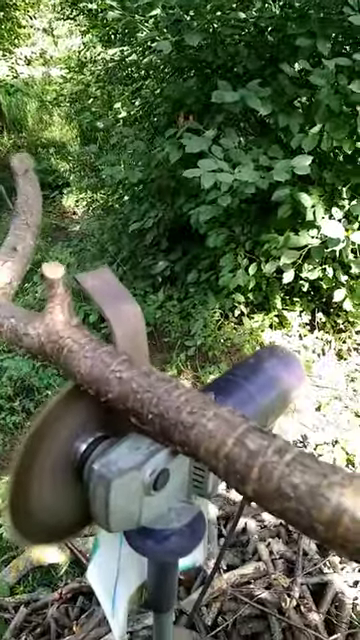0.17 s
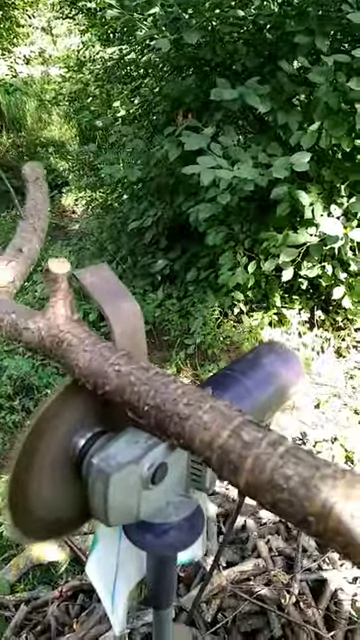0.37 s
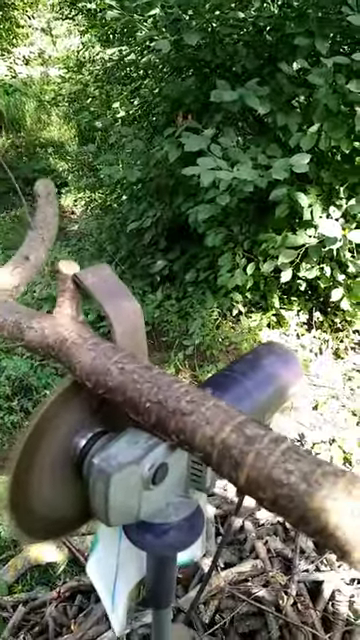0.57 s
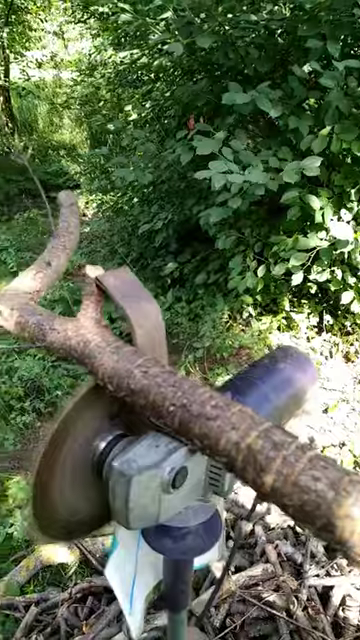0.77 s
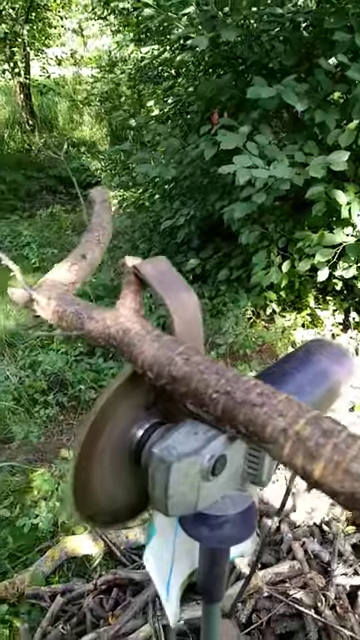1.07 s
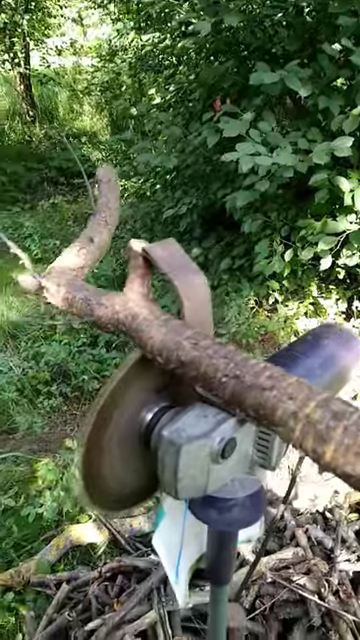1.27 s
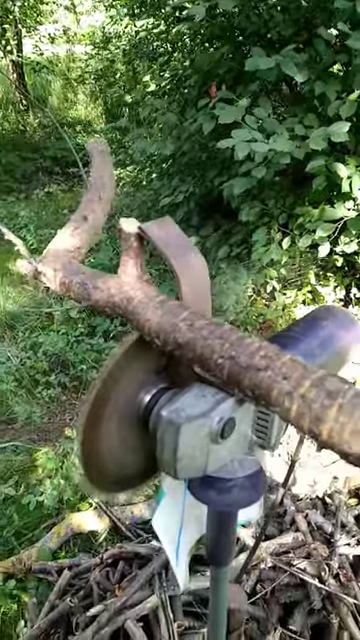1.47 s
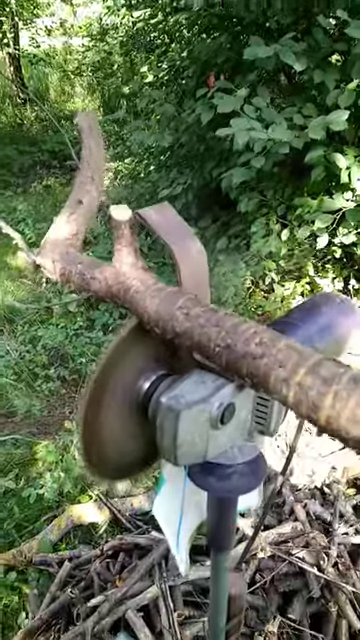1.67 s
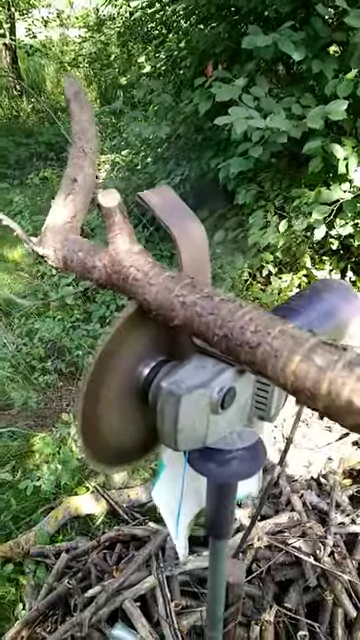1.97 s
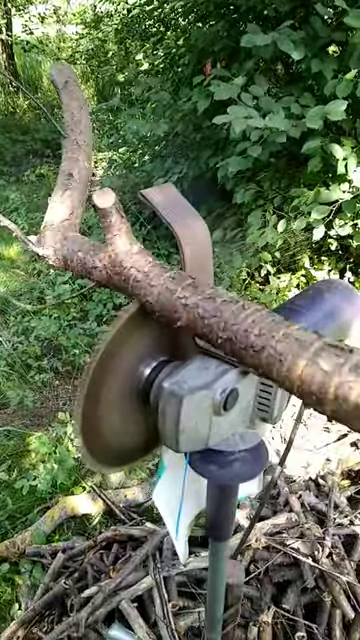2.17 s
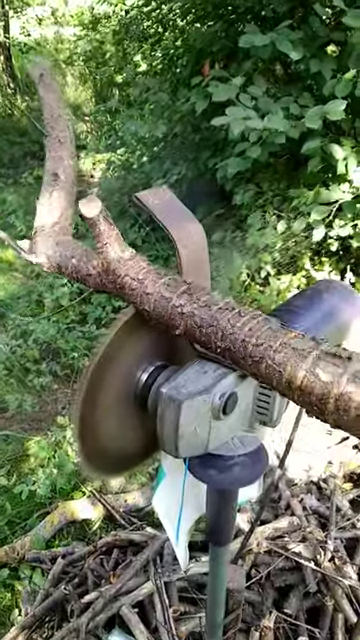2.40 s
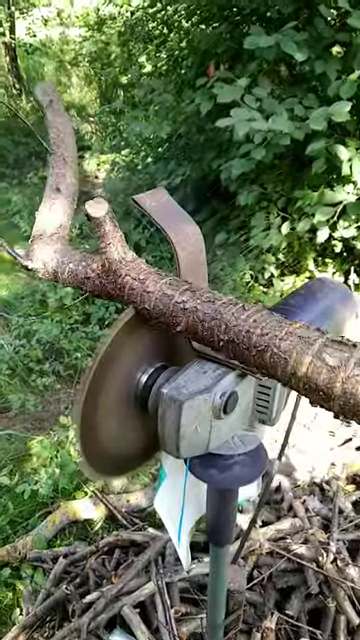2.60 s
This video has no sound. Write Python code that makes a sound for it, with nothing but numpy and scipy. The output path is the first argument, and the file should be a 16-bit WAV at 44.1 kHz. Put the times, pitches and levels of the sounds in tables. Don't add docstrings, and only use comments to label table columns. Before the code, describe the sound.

Loud metallic whine of an angle grinder slowing against wood, with harsh scraping, squeals and rushing hiss.

```python
import sys
import numpy as np
from scipy import signal
from scipy.fft import irfft, next_fast_len
from scipy.io import wavfile
from scipy.ndimage import uniform_filter1d

SR = 44100
rng = np.random.default_rng(int(sys.argv[2]) if len(sys.argv) > 2 else 0)


def transcribe(signal):
    frames = np.atleast_2d(signal).T
    limited = np.clip(frames, -1, 1)
    pcm = np.round(limited * 32767).astype(np.int16)
    wavfile.write(sys.argv[1], SR, pcm)


def level_to_linear(level):
    exponent = np.asarray(level, float) / 20
    return 10 ** exponent


N = 120834
T = np.arange(N) / SR


def evened(x):
    return x / np.sqrt(np.mean(abs(x) ** 2) + 1e-20)


def along(points):
    return np.interp(T, *np.transpose(points))


def read(points, hz):
    f, value = np.transpose(points)
    return np.interp(np.log(hz + 1), np.log(f + 1), value)


def drift(rate_hz, channels=1):
    f = np.geomspace(rate_hz / 20, rate_hz, 12)[:, None]
    t = T[::256]
    curves = []
    for _ in range(channels):
        sines = np.sin(2 * np.pi * (f * t + rng.random(f.shape)))
        curves.append(np.interp(T, t, evened(sines.sum(0))))
    return np.array(curves)


def gate(start, length, rise, fall):
    opening = np.clip((T - start) / rise + .5, 0, 1)
    return opening * np.exp(-np.maximum(T - start - length, 0) / fall)


def pair(same, shape):
    a, b, c, d = rng.standard_normal((4,) + shape)
    same = np.clip(same, -1, 1)
    left = a + 1j * b
    right = same * left + np.sqrt(1 - same ** 2) * (c + 1j * d)
    return np.array([left, right])


def lean(db):
    return level_to_linear(np.array([[.5], [-.5]]) * db)


# t/s, lead/us
LEFT_LEAD = [(0, 15), (.8, 10), (1.2, -5), (1.9, -45), (2.74, -28)]


def carried(hz, shape, span=slice(None)):
    lead = np.exp(1j * np.pi * along(LEFT_LEAD)[span] * hz / 1e6)
    tone = np.exp(2j * np.pi * np.cumsum(hz) / SR)
    return np.sqrt(2) * (shape * tone * np.array([lead, lead.conj()])).real


def ring(hz, width_hz):
    hop, same, steady = 64, .75, 1.7
    r = np.exp(-np.pi * width_hz / SR * hop)
    shaken = signal.lfilter([1], [1, -r], pair(same, (N // hop + 60,)))
    slow = evened(shaken[:, 50:])
    phase = np.cumsum(rng.standard_normal(slow.shape[1])) * np.sqrt(2 - 2 * r)
    slow = evened(slow + steady * np.exp(1j * phase))
    at = np.arange(slow.shape[1]) * hop
    return carried(hz, np.array([np.interp(np.arange(N), at, s) for s in slow]))


def noise(shape_db, same, patch_db, comb_db=0):
    frames, hz = N // 256 + 5, np.fft.rfftfreq(1024, 1 / SR)
    patches, comb = rng.standard_normal((2, frames, 513))
    patches = evened(uniform_filter1d(uniform_filter1d(patches, 14, 0), 10, 1))
    comb = evened(uniform_filter1d(uniform_filter1d(comb, 18, 0), 3, 1))
    comb = comb * np.clip(hz / 2800, 0, 1) ** 2
    gain = level_to_linear(shape_db(hz) + patch_db * patches + comb_db * comb)
    z = pair(read(same, hz), (frames, 513)) * gain
    return evened(signal.istft(z.transpose(0, 2, 1), nperseg=1024, noverlap=768)[1][:, :N])


# t/s, f/Hz
MESH = [
    (0, 4560),
    (.3, 4400),
    (.85, 4010),
    (1.5, 3700),
    (2.0, 3535),
    (2.74, 3500),
]


def slowing():
    return (MESH[0][1] - along(MESH)) / (MESH[0][1] - MESH[-1][1])


# fast f/Hz, slow f/Hz, width/Hz
WITH = [(3310, 3170, 35), (4430, 4338, 25), (5905, 5760, 25), (7720, 7510, 25), (7640, 7415, 18),
        (9170, 8860, 35), (9450, 9250, 30), (10560, 10300, 40), (10870, 10760, 35), (11400, 11220, 30),
        (12120, 11700, 30), (13570, 13280, 30), (2760, 2720, 45)]
# fast level/dB, slow level/dB
WITH_RING = [(-42.5, -47), (-41.5, -30), (-35, -37), (-37, -36.5), (-67, -28.5), (-37.5, -38), (-42.5, -32),
             (-44, -37.5), (-64, -32.5), (-60, -38), (-53, -46), (-54, -54), (-44.5, -45)]
# fast f/Hz, slow f/Hz, width/Hz
AGAINST = [(3550, 3630, 22), (4700, 4835, 25), (6150, 6250, 25), (7680, 7850, 22), (8200, 8150, 45),
           (6480, 6400, 25), (3230, 3290, 40)]
# fast level/dB, slow level/dB
AGAINST_RING = [(-48.5, -43), (-54, -39.5), (-78.5, -33), (-46, -35.5), (-37, -61), (-30.5, -63),
                (-39.5, -44)]
# start t/s, length t/s, level/dB, f/Hz
SURGES = [(1.235, 0.074, -28.5, 4350), (1.646, 0.054, -34, 4345), (2.195, .044, -38, 4335),
          (2.582, 0.047, -35, 4330), (2.674, .05, -39, 4330), (.864, 0.025, -35, 7670),
          (0.97, 0.21, -38, 7700), (1.227, 0.041, -35, 7640), (1.421, 0.026, -34, 6800),
          (0.96, 0.027, -31, 7470), (1.616, 0.03, -36, 7450), (2.5, 0.051, -33, 7510),
          (.852, 0.15, -43, 9800), (1.427, 0.32, -33.5, 9290), (2.4, 0.24, -33, 9270),
          (2.321, 0.075, -42, 9250), (2.454, .19, -40, 9250), (.978, 0.02, -34, 5810),
          (0.75, .05, -36, 5830), (0.62, 0.093, -27.5, 9410), (.62, 0.12, -28.5, 7700),
          (.15, 0.17, -39, 9150), (0.018, .2, -37, 13560), (0.29, 0.066, -34, 12070),
          (1.33, .12, -37.5, 10400), (2.45, .29, -34, 13285), (1.65, .6, -38, 13300),
          (2.5, .24, -32, 10290), (1.8, .35, -34, 8870), (2.38, 0.18, -28, 6250), (2.26, 0.36, -32.5, 5762),
          (0.203, 0.413, -33, 4410), (1.45, 0.71, -40.5, 5780)]
# t/s, left-right level/dB
RING_LEAN = [(0, -14), (.9, -1.5), (2.74, -0.5)]
GEAR = [1, 1.04, 1.13, 2.02, 2.09]
GEAR_DB = [-47, -44.5, -41, -43, -35.5]


def disc():
    swell_db, swell_hz = 1.2, [12, 11]
    edge_s, burst_rings_db = .015, -4
    gear_width_hz, gear_fade_db = 8, -4
    mesh, slowed = along(MESH), slowing()
    waves, strengths = WITH + AGAINST, WITH_RING + AGAINST_RING
    pitches = np.array([f + (g - f) * slowed for f, g, _ in waves])
    surges = np.zeros_like(pitches)
    for s, d, db, hz in SURGES:
        nearest = np.argmin(abs(pitches[:, round(s * SR)] - hz))
        surges[nearest] += level_to_linear(db) * gate(s, d, edge_s, edge_s)
    shakes = []
    for (s, d, low, high), db in zip(BURSTS, BURSTS_DB):
        shakes.append((low, high, level_to_linear(db + burst_rings_db) * gate(s, d, 3 * edge_s, 3 * edge_s)))

    out = np.zeros((2, N))
    for (f, g, w), (a, b), pitch, surge in zip(waves, strengths, pitches, surges):
        shaken = sum(shake for low, high, shake in shakes if low < (f + g) / 2 < high)
        drive = level_to_linear(a + (b - a) * slowed) + shaken * level_to_linear(.5 * (a + b) + 36) + surge
        out += drive * level_to_linear(swell_db * drift(swell_hz[0])) * ring(pitch, w)
    for multiple, db in zip(GEAR, GEAR_DB):
        level_db = db + gear_fade_db * slowed + swell_db * drift(swell_hz[1])
        out += level_to_linear(level_db) * ring(multiple * mesh, gear_width_hz)
    return out * lean(along(RING_LEAN))


def band_bursts(rows, levels_db, lean_db):
    same, edge_s = 0.09, .018
    out, size = np.zeros((2, N)), next_fast_len(N)
    hz = np.fft.rfftfreq(size, 1 / SR)
    z = pair(same, hz.shape)
    for (s, d, low_hz, high_hz), db in zip(rows, levels_db):
        inside = np.clip(np.minimum(hz - low_hz, high_hz - hz) / 60, 0, 1)
        band = np.roll(z, round(s * SR), 1) * inside
        out += level_to_linear(db) * gate(s, d, edge_s, edge_s) * evened(irfft(band, size)[:, :N])
    return out * lean(lean_db) * level_to_linear(drift(30))


# start t/s, length t/s, low f/Hz, high f/Hz
BURSTS = [(0, .76, 5000, 6100), (0, .34, 6100, 9500), (.38, .07, 7500, 9500), (.6, .16, 7600, 9500),
          (.6, .16, 5000, 6150), (.22, .1, 5000, 6400), (1.26, .1, 5000, 6100), (1.64, .1, 5000, 6000),
          (2.38, .23, 5900, 7700), (2.03, .22, 2700, 3500), (1.58, .15, 1300, 3000), (2.0, .07, 5000, 6000),
          (.2, .6, 2600, 4500), (2.26, .12, 6800, 7900)]
BURSTS_DB = [-22.5, -32.5, -28.5, -26.5, -33, -22, -31, -31.5, -25, -36.5, -33, -35, -35, -27.5]


def bursts():
    return band_bursts(BURSTS, BURSTS_DB, lean_db=-1.5)


# start t/s, length t/s, low f/Hz, high f/Hz
FIZZ = [
    (0, .05, 12000, 15400),
    (.17, .08, 12000, 15400),
    (.295, .06, 12000, 15400),
    (.47, .07, 9600, 15400),
]
FIZZ_DB = [-43, -29, -22.5, -29.5]


def fizz():
    return band_bursts(FIZZ, FIZZ_DB, lean_db=-11.5)


# f/Hz, level/dB per Hz
HISS = [(180, -59), (300, -16.5), (2480, -6.5), (2740, -8), (3810, -6.5), (4280, -6.5), (5050, -9.5),
        (7250, -8), (15500, -13.5)]
# t/s, level/dB
HISS_DB = [(0.0, -30.5), (2.51, -31.5), (2.74, -32.5)]
# f/Hz, likeness/-1 to 1
HISS_SAME = [(300, -0.2), (1200, 0.24), (3000, -0.45), (5500, -0.13), (15000, 0.17)]
# fast f/Hz, slow f/Hz, width/Hz
DIPS = [(4900, 5010, 70), (6750, 6750, 250), (8600, 8370, 200), (10000, 9950, 200), (3750, 3830, 110),
        (4650, 4550, 80), (11000, 10960, 110), (12600, 12250, 200), (9700, 9540, 90), (5400, 5500, 120),
        (6050, 5980, 70), (8050, 8020, 70)]
DIPS_DB = [-9, -3.5, 0, -2, -5, -10, 2, -2, -3, 1, -5, -2]


def hiss():
    lift_db, swell_db = 10, 0.4
    t = np.arange(N // 256 + 5)[:, None] * 256 / SR
    slowed = np.interp(t, T, slowing())

    def shape(hz):
        dips = 0
        for (f, g, w), db in zip(DIPS, DIPS_DB):
            dips = dips + db * np.exp(-((hz - f - (g - f) * slowed) / w) ** 2)
        return read(HISS, hz) + dips - 30 * (hz < 150)

    level_db = along(HISS_DB) + lift_db + swell_db * drift(16)
    return noise(shape, HISS_SAME, patch_db=1.2, comb_db=5.5) * level_to_linear(level_db)


# f/Hz, level/dB per Hz
WIND = [(15, -43), (25, -37), (97, -4), (162, -7.5), (275, -5), (515, -16.5), (700, -16), (910, -42),
        (1540, -120)]
# f/Hz, level/dB per Hz
LOW_LEFT = [(25, -49), (60, -4.5), (120, -4.5), (250, -4.5), (700, -5.5), (1200, -21)]
# t/s, level/dB
GUSTS = [
    (0, -47.5),
    (.4, -52),
    (.5, -40),
    (.62, -39),
    (.7, -45.5),
    (1.3, -49),
    (2.74, -48),
]
# t/s, level/dB, f/Hz
THUMPS = [(0.371, -27, 102), (0.476, -23.5, 109), (.517, -22, 140), (0.586, -21, 96), (0.689, -32, 70),
          (0.868, -28, 89), (1.188, -25, 84.5), (1.219, -31, 61.5), (1.589, -28, 91), (1.92, -33, 65),
          (1.55, -32, 60)]


def wind():
    right_db, left_db, lump_db, thump_cycles = 8, -40, 1.5, 0.7
    lumps = level_to_linear(lump_db * drift(30, channels=2))
    apart = [(1, 0), (SR, 0)]
    left = noise(lambda hz: read(LOW_LEFT, hz) - 40 * (hz > 1200), apart, 1)[0] * level_to_linear(left_db)
    right = noise(lambda hz: read(WIND, hz) - 40 * (hz > 700), apart, 1)[0] * level_to_linear(along(GUSTS) + right_db)
    thumps = np.zeros(N)
    for s, db, hz in THUMPS:
        puff = np.exp(-((T - s) * hz / thump_cycles) ** 2)
        thumps += level_to_linear(db) * puff * np.sin(2 * np.pi * hz * (T - s))
    return lumps * np.array([left, right]) + np.array([0 * T, thumps])


# start t/s, length t/s, f/Hz, level/dB, left-right level/dB
FLARES = [(0.021, 0.028, 5910, -30, -16), (0.109, 0.039, 5892, -32, -20), (0.239, 0.023, 5890, -27, -29),
          (0.372, 0.043, 5895, -18, -7), (0.49, 0.074, 5880, -24.5, 6), (0.601, 0.035, 5860, -11, -6),
          (.65, 0.021, 5865, -14, -9), (.688, 0.018, 5840, -9.5, -4.5), (0.724, 0.012, 5855, -16.5, 13),
          (0.765, 0.089, 5840, -32, 6), (1.283, .05, 5785, -24.5, -5), (0.285, 0.085, 4415, -30, 4),
          (0.529, 0.07, 4400, -27, -4)]


def flares():
    rise_s, fall_s = .006, .006
    out, wobble = np.zeros((2, N)), level_to_linear(1.2 * drift(70))
    for s, d, hz, db, side_db in FLARES:
        span = slice(max(round((s - .02) * SR), 0), round((s + d + .08) * SR))
        shape = (level_to_linear(db) * wobble * gate(s, d, rise_s, fall_s))[:, span]
        out[:, span] += lean(side_db) * carried(hz + 0 * T[span], shape, span)
    return out


# start t/s, length t/s, f/Hz, width/Hz
SHADES = [(.33, .08, 6900, 350), (.49, .12, 6750, 450), (.68, .1, 6650, 300), (.57, .25, 10050, 400),
          (1.2, .16, 3550, 150), (.49, .05, 8600, 350), (.84, .2, 8600, 250), (1.12, .07, 5100, 220),
          (.31, .18, 3750, 120), (1.3, .4, 6720, 150), (1.38, .3, 8500, 200), (1.25, .2, 10000, 220),
          (2.04, .2, 3800, 120), (2.1, .1, 2500, 100), (2.14, .05, 5200, 220), (2.26, .26, 8450, 220),
          (2.29, .08, 9800, 300), (1.9, .17, 8350, 200), (2.0, .08, 6780, 150), (2.3, .06, 3950, 150),
          (1.69, .07, 4750, 150), (2.5, .24, 12800, 200), (.89, .05, 4850, 200), (2.4, .22, 4620, 110),
          (.95, .07, 3650, 120), (2.45, .14, 10020, 150)]


def shaded(x):
    depth_db = -21
    hz, t, z = signal.stft(x, SR, nperseg=512)
    shade_db = 0
    for s, d, f, w in SHADES:
        during = (s < t) & (t < s + d)
        shade_db = shade_db + depth_db * during * np.exp(-((hz[:, None] - f) / w) ** 4)
    return signal.istft(z * level_to_linear(shade_db), SR, nperseg=512)[1][:, :N]


def scene():
    machine = disc() + bursts() + fizz() + hiss()
    return shaded(machine) + wind() + flares()


def low_pass(x):
    return signal.sosfilt(signal.butter(12, 16720, fs=SR, output="sos"), x)


def record(dry):
    treble_cut = signal.firwin(1023, 15480, window=("kaiser", 9), fs=SR)
    x = signal.oaconvolve(np.clip(dry, -1, 1), treble_cut[None], "same")
    x = signal.sosfilt(signal.butter(2, 40, "high", fs=SR, output="sos"), x)
    return low_pass(x)


dry = scene()
out = record(dry)
transcribe(out)
```